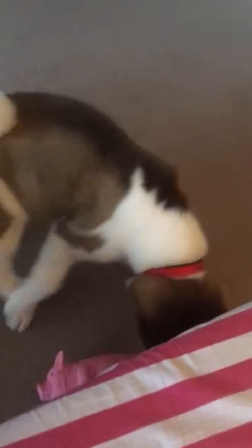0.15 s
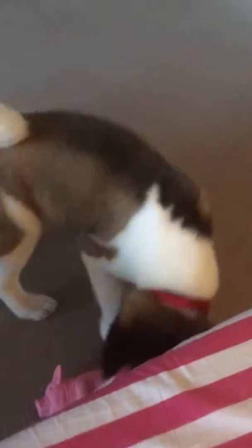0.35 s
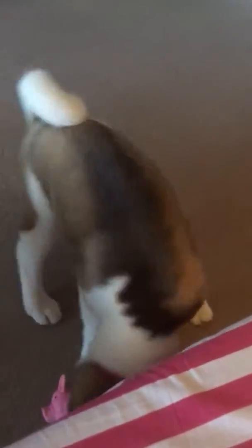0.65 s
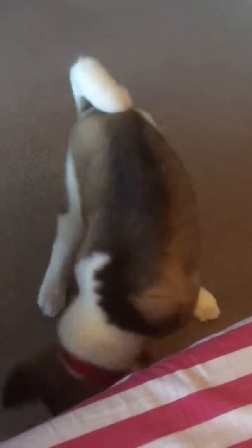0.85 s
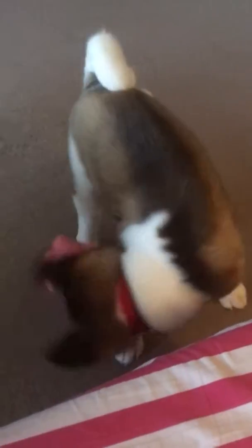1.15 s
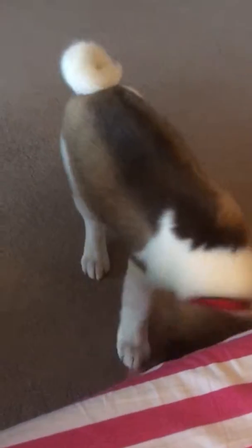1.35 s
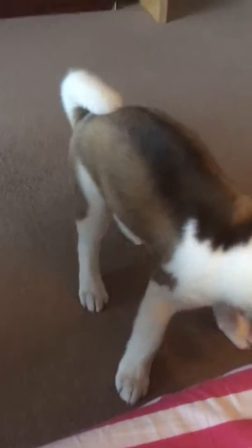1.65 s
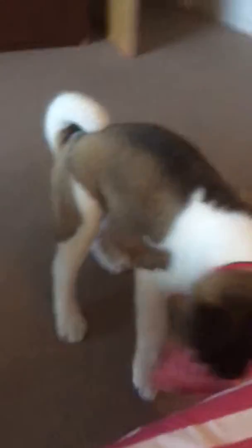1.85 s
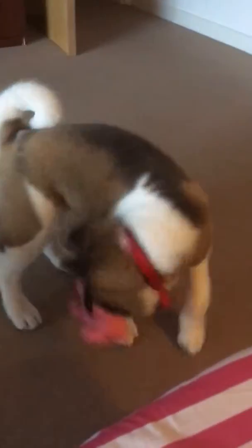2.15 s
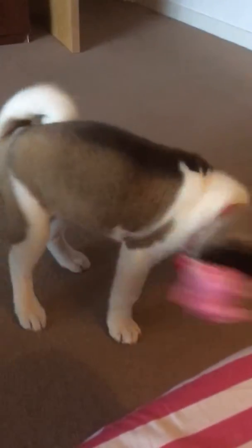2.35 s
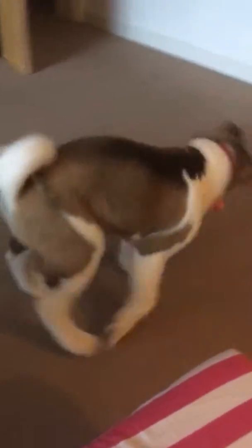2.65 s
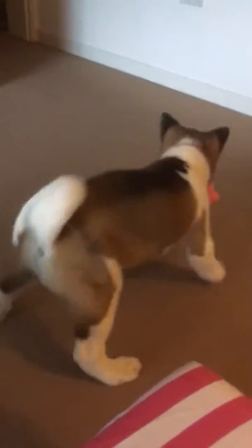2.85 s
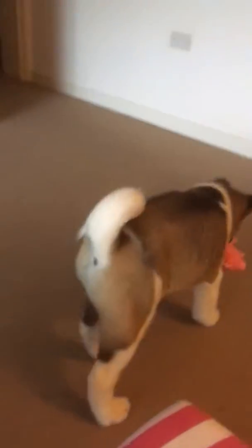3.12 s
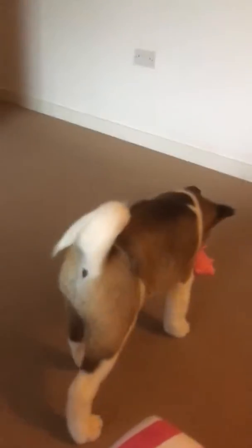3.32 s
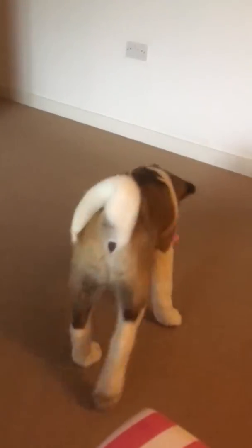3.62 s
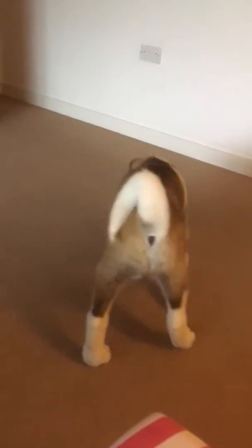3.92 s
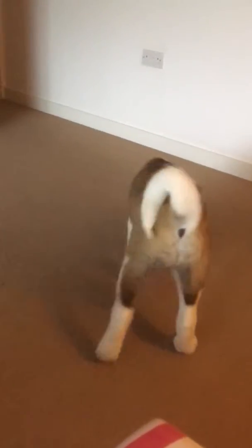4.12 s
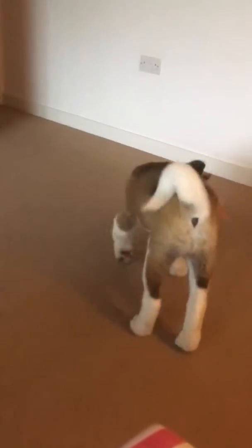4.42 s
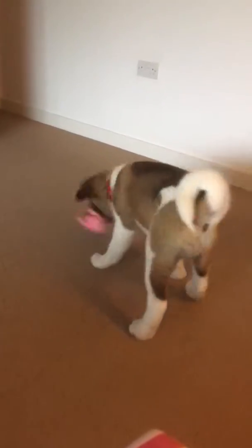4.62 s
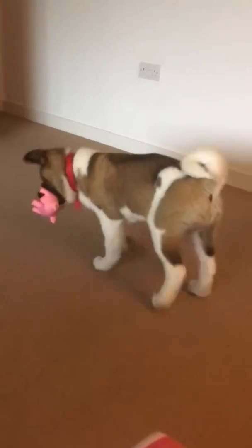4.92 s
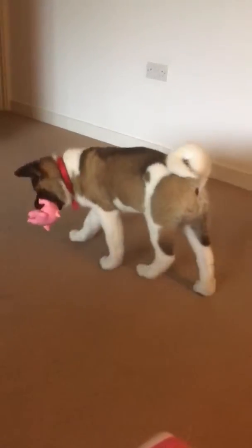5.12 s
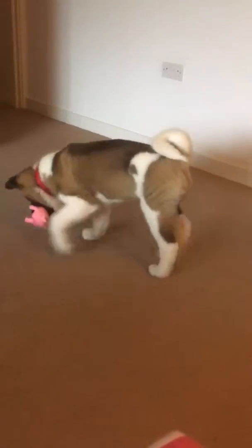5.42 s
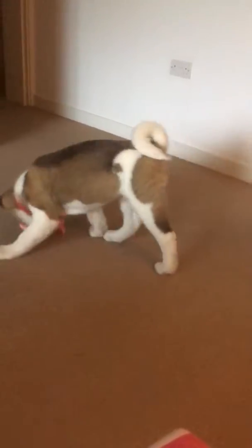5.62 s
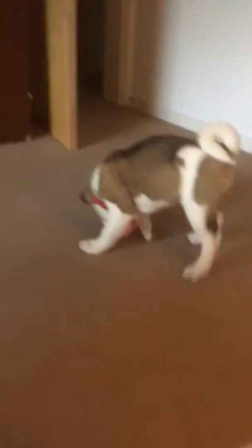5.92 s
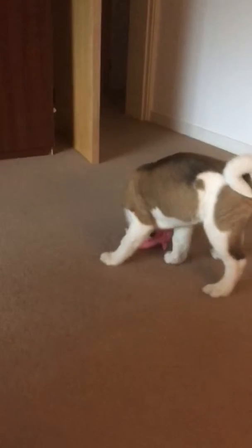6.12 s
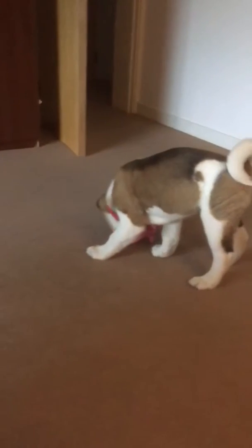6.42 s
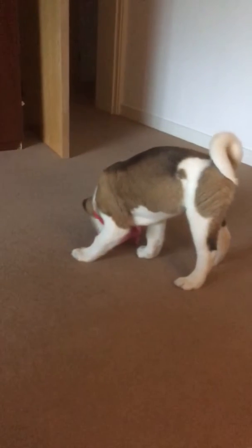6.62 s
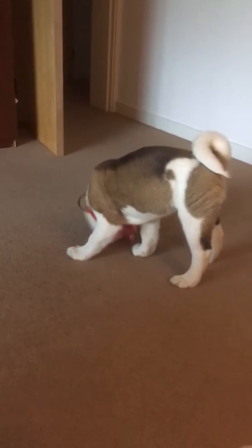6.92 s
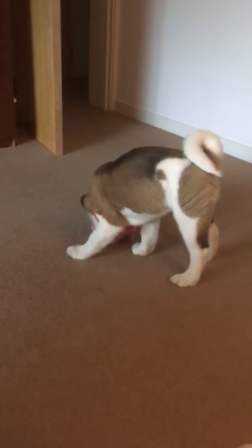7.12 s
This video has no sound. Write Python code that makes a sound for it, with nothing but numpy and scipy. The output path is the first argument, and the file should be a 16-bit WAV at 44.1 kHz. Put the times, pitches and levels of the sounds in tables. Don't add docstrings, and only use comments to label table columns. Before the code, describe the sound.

Short, croaky rubber-toy squeaks come in bursts amid fur brushing carpet, dull paw knocks and claw ticks, over faint house rumble and hiss.

```python
import sys
import numpy as np
from scipy import signal
from scipy.fft import rfft, irfft, next_fast_len
from scipy.io import wavfile
from scipy.ndimage import uniform_filter1d, map_coordinates

SR = 44100
rng = np.random.default_rng(int(sys.argv[2]) if len(sys.argv) > 2 else 0)


def voltage_ratio(decibels):
    exponent = np.asarray(decibels, float) / 20
    return 10 ** exponent


def master(y):
    cut = np.clip(np.atleast_2d(y).T, -1, 1)
    pcm = np.round(cut * 32767)
    wavfile.write(sys.argv[1], SR, pcm.astype(np.int16))


N = 320607


def unit(x):
    return x / np.sqrt(np.mean(x ** 2) + 1e-20)


def along(points, hz):
    f, v = np.transpose(points)
    return np.interp(np.log(hz + 1), np.log(f + 1), v)


def filtered(x, response):
    m = next_fast_len(len(x) + 4096)
    return irfft(rfft(x, m) * response(np.fft.rfftfreq(m, 1 / SR)), m)[:len(x)]


def ringing(modes):
    def shape(f):
        total = 0
        for k, (centre, width, db) in enumerate(modes):
            mode = 1j * f * width / (centre * centre - f * f + 1j * f * width)
            total = total + (-1) ** k * voltage_ratio(db) * mode
        return total
    return lambda f: shape(f) / np.sqrt(np.mean(np.abs(shape(f)) ** 2))


def dulled(hz, edge_hz):
    return 1 / (1 + 1j * hz / edge_hz) ** 2


def noise(spectrum):
    return unit(filtered(rng.standard_normal(N), lambda hz: voltage_ratio(along(spectrum, hz))))


def wobble(rate):
    return map_coordinates(rng.standard_normal(int(N * rate / SR) + 4), [np.arange(N) * rate / SR])


def add(track, s, sound, wet_db):
    # (frequency [Hz], time [s])
    fade_times = [(100, 0.31), (400, 0.33), (650, 0.18), (900, 0.43), (1300, 0.35), (2800, 0.3),
                  (7300, 0.36), (15000, 0.21)]
    # (frequency [Hz], level [dB])
    echo_colour = [(150, 1), (1000, 1.5), (3000, .5), (6000, -2.5), (12000, -3)]
    hz, t, z = signal.stft(rng.standard_normal(SR // 2), SR, nperseg=256)
    tail = signal.istft(z * voltage_ratio(-60 * t / along(fade_times, hz)[:, None]), SR, nperseg=256)[1]
    tail = tail / np.linalg.norm(tail)
    tail = tail * np.clip((np.arange(len(tail)) / SR - .003) / .007, 0, 1)
    tail = filtered(tail, lambda hz: voltage_ratio(along(echo_colour, hz)))
    heard = voltage_ratio(wet_db) * signal.fftconvolve(sound, tail)
    heard[:len(sound)] += sound
    start = round(s * SR)
    track[start:start + len(heard)] += heard


def house():
    # (frequency [Hz], density [dB per Hz])
    deep_colour = [(22, -53), (35, 6), (50, 12), (62, 4.5), (90, -47)]
    # (frequency [Hz], density [dB per Hz])
    drone_colour = [(40, -48), (58, -7.5), (70, -1.5), (100, -6.5), (170, -20.5), (400, -49.5)]
    # (frequency [Hz], density [dB per Hz])
    hiss_colour = [(88, -47), (150, 7.5), (315, -6.5), (888, -5), (1480, -8.5), (2270, -9.5), (4950, -14.5),
                   (10400, -15.5), (14500, -10), (16000, -13.5)]
    # (time [s], level [dB])
    stir = [
        (0, -51),
        (.4, -67),
        (2, -61),
        (3.3, -64.5),
        (3.75, -59.5),
        (4.6, -61.5),
        (5.1, -70.5),
        (5.8, -62.5),
        (7.27, -71.5),
    ]
    s, stir_db = np.transpose(stir)
    t = np.arange(N) / SR
    swell_db = -67.5 + 1.32 * t
    deep = voltage_ratio(swell_db + 0.72 * wobble(1.6)) * noise(deep_colour)
    drone = voltage_ratio(np.interp(t, s, stir_db) + 4.7 * wobble(13.0)) * noise(drone_colour)
    return deep + drone + voltage_ratio(-64.5) * noise(hiss_colour)


def carpet():
    # (start [s], length [s], dull rub level [dB], bright scuff level [dB])
    strokes = [(0, 0.027, -61, -65), (0.072, 0.061, -62, -62), (0.218, 0.078, -64, -60.5),
               (0.337, 0.068, -63.5, -71), (0.565, 0.16, -65, -68.5), (0.97, 0.13, -59.5, -63.5),
               (1.584, 0.087, -70, -71), (1.714, 0.057, -71, -67.5), (1.808, 0.048, -71, -74),
               (2.133, 0.11, -65, -64), (2.415, 0.05, -61, -61.5), (2.507, 0.017, -63.5, -66),
               (2.635, 0.094, -63, -66), (2.809, 0.045, -63.5, -62.5), (2.886, 0.12, -80, -70.5),
               (2.966, 0.078, -75, -64), (3.052, 0.084, -62.5, -91), (3.215, 0.072, -70, -71),
               (3.814, 0.052, -61.5, -65), (3.903, 0.038, -64.5, -57.5), (4.531, 0.013, -61.5, -83),
               (4.634, 0.04, -60.5, -67), (4.7, 0.038, -63.5, -57.5), (4.786, .1, -75, -72.5),
               (4.895, 0.06, -88, -68), (5.083, 0.21, -61, -66.5), (5.636, 0.053, -57, -63),
               (6.493, 0.051, -67.5, -90)]
    # (frequency [Hz], density [dB per Hz])
    rub_colour = [(150, 2.5), (400, 5.5), (1500, 0), (3500, -7), (7000, -15.5)]
    # (frequency [Hz], density [dB per Hz])
    fur_colour = [(590, -33), (1000, -16), (2440, 4), (3750, 1), (10200, -2.5), (14600, -2.5), (16000, -75)]
    # (frequency [Hz], width [Hz], level [dB])
    hollow_modes = [(1400, 250, -3.5), (2360, 200, 1.5), (3460, 290, -3)]
    t, dull, bright = np.arange(N) / SR, np.zeros(N), np.zeros(N)
    for s, length, rub_db, scuff_db in strokes:
        stroke = np.clip((t - s) / 0.0095, 0, 1) * voltage_ratio(-60 * np.clip(t - s - length, 0, 1) / 0.2)
        dull += stroke * voltage_ratio(rub_db)
        bright += stroke * voltage_ratio(scuff_db)
    hollow = np.zeros(N)
    for hz, width, db in hollow_modes:
        tone = unit(filtered(rng.standard_normal(N), ringing([(hz, width, 0)])))
        hollow += voltage_ratio(db + 5.7 * wobble(14)) * tone
    rub = dull * voltage_ratio(1.2 * wobble(76)) * (noise(rub_colour) + voltage_ratio(-14.5) * hollow)
    return rub + bright * voltage_ratio(2.3 * wobble(120)) * noise(fur_colour)


def claws():
    # (time [s], peak level [dB], pitch [Hz])
    ticks = [
        (0.127, -55, 2380),
        (1.8238, -46, 2060),
        (2.4288, -32.5, 1840),
        (2.645, -45, 4520),
        (6.537, -30.5, 660),
        (4.541, -56, 1400),
        (4.583, -40, 636),
    ]
    track, t = np.zeros(N + SR), np.arange(SR // 50) / SR
    for s, db, hz in ticks:
        tick = np.sin(2 * np.pi * hz * t) + 0.42 * np.sin(2 * np.pi * 1.8 * hz * t)
        add(track, s, voltage_ratio(db - 10.0 - 60 * t / 0.016) * tick, wet_db=-9)
    return track[:N]


def paws():
    # (time [s], peak level [dB], board pitch [Hz], slap against thump [dB])
    thumps = [(0.014, -35.5, 108, -15.5), (0.074, -44.5, 118, -9), (1.095, -39.5, 149, -2.5),
              (1.496, -31.5, 242, -7.5), (1.507, -19, 176, -11), (1.529, -28, 140, -36),
              (2.51, -34, 92, -23), (2.689, -51, 134, -5), (2.839, -53, 69, -21),
              (2.968, -31.5, 104, -18.5), (3.299, -51.5, 60, -9), (4.239, -47.5, 111, -9),
              (4.372, -38, 66.5, -9.5), (4.547, -54, 61.9, -3), (4.648, -37.5, 72, -16),
              (4.68, -37, 61.9, -34), (4.72, -41, 71.4, -39), (5.109, -57.5, 61.9, 8.5),
              (5.657, -40, 101, -23), (5.688, -34, 77.5, -38), (6.05, -35, 86, -9),
              (6.534, -43.5, 176, -10.5)]
    track, t = np.zeros(N + SR), np.arange(SR // 5) / SR
    pad = ringing([(279, 190, 8), (514, 290, 9), (810, 660, -0.5)])
    for s, db, hz, slap_db in thumps:
        boards = np.sin(2 * np.pi * hz * t) * voltage_ratio(-60 * t / 0.1) * (1 - np.exp(-t / 0.0012))
        burst = rng.standard_normal(len(t)) * voltage_ratio(-60 * t / .08)
        slap = filtered(burst, lambda f: pad(f) * dulled(f, edge_hz=1000))
        add(track, s, voltage_ratio(db - 0.9) * boards + voltage_ratio(db + slap_db + 1.5) * slap, wet_db=-3.5)
    return track[:N]


def pressure(t, start, end, onset_db, bend, peak_s, peak_db, last_db):
    missing_db = onset_db * np.clip((peak_s - t) / max(peak_s - start, .01), 0, 1) ** bend
    fall = np.clip((t - peak_s) / max(end - peak_s, .003), 0, 1) ** 1.57
    return missing_db, peak_db - missing_db + (last_db - peak_db) * fall


def flap_slaps(t, s, rate, ring_db):
    rate_now = np.interp(t, s, rate)
    turns = np.cumsum(rate_now) / SR
    slaps = (np.diff(np.floor(turns), prepend=-1) > 0) & (t < s[-1] + .5 / rate[-1])
    limp_db = 2.5 * np.interp(rate_now, [150, 195], [0, 1]) * (-1) ** np.floor(turns)
    return slaps * voltage_ratio(21.5 + ring_db - limp_db + rng.standard_normal(len(t)))


def puffs(clicks):
    def rush(shape, mode="full"):
        return signal.fftconvolve(clicks, shape, mode)[:len(clicks)] * rng.standard_normal(len(clicks))
    puff_t = np.arange(400) / SR
    puff = (puff_t / .001) ** 1.5 * voltage_ratio(-60 * puff_t / .0065)
    leak = rush(np.hanning(900), "same")
    air = rush(puff / np.linalg.norm(puff)) + voltage_ratio(-40) * leak
    return air, rush(voltage_ratio(-60 * puff_t / .011) * puff)


def tube_ring(shut, air, flat, tube_hz, flank_db, upper_db):
    # (frequency [Hz], width [Hz], level [dB])
    upper_modes = [(3670, 670, -17.5)]
    upper = [(hz, width, db + upper_db) for hz, width, db in upper_modes]
    sound = 0
    for way in (-.5, .5):
        pitch_hz = tube_hz * (1 - way * 0.029)
        tube = ringing([(0.93 * pitch_hz, 500, flank_db), (pitch_hz, 115, 0)] + upper)
        push = (.5 + 2 * way * flat) * (shut + 0.5 * air)
        sound = sound + filtered(push, lambda hz: voltage_ratio(6.0) * tube(hz) * dulled(hz, edge_hz=2030))
    return sound


def snout_ring(shut, air, snout_hz, db):
    # (share of snout pitch [times], width [Hz], level [dB])
    snout_modes = [(0.766, 139, 4.5), (1.012, 135, 7.5), (1.218, 111, 7), (1.65, 233, -0.5)]
    snout = ringing([(k * snout_hz, width, level) for k, width, level in snout_modes])
    return filtered(voltage_ratio(db + 0.5) * (shut + 0.59 * air), lambda hz: snout(hz) * dulled(hz, edge_hz=1790))


def belly_ring(shut, db, wet_db):
    # (frequency [Hz], width [Hz], level [dB])
    belly_modes = [(193, 52, 8.5), (285, 720, -7)]
    belly = ringing([(100.5, 50, -10 - 2.1 * wet_db)] + belly_modes)
    return filtered(voltage_ratio(db + 1) * shut, lambda hz: belly(hz) * dulled(hz, edge_hz=740))


def jet_whistle(shut, air, jet_hz, db):
    # (frequency [Hz], width [Hz], level [dB])
    jet_modes = [(4586, 310, -7.5), (5170, 190, -8.5), (6140, 1540, -6.5)]
    jet = ringing([jet_modes[0], jet_modes[1], (jet_hz, 500, 0), jet_modes[2]])
    return filtered(voltage_ratio(db) * (air + 0.068 * shut), lambda hz: jet(hz) * (1 - dulled(hz, edge_hz=8600)))


def spit_spray(spit, db, top_db, wet_db):
    # (frequency [Hz], width [Hz], level [dB])
    spit_modes = [(7910, 490, 0.5), (9500, 610, 1), (11280, 780, -2), (12750, 900, -2.5), (15000, 680, -7)]
    thin = ringing([(hz, width, level + rng.normal(0, 2.7)) for hz, width, level in spit_modes])

    def response(hz):
        tilt_db = top_db * (hz / 15000) ** 2 - 0.84 * wet_db * (hz / 15000) ** 4
        return thin(hz) * (1 - dulled(hz, edge_hz=11000)) * voltage_ratio(tilt_db)
    return filtered(voltage_ratio(db - 6.5) * spit, response)


def toy():
    # (time [s], slaps a second [1/s])
    flaps = [
        [(0.6542, 133.8), (0.7012, 212.7), (0.7702, 103.6)],
        [(0.7822, 68.2), (0.9292, 76.7), (0.9622, 67.0)],
        [(1.0592, 83.6), (1.1012, 59.4)],
        [(1.1992, 57.9), (1.3222, 66.9), (1.3412, 74.1)],
        [(1.5062, 63.5), (1.5632, 41.9)],
        [(1.9032, 77.8), (1.9222, 128.1), (1.9762, 59.1)],
        [(2.0605, 80.0), (2.078, 101.0), (2.1352, 58.0)],
        [(2.3292, 86.8), (2.3552, 68.2), (2.3872, 56.3)],
        [(3.3977, 76.0), (3.4372, 74.5), (3.4682, 57.9)],
        [(3.6672, 79.6), (3.6912, 88.2), (3.7572, 63.2)],
        [(4.0892, 113.9), (4.1262, 99.2), (4.1722, 77.8)],
        [(4.349, 82.0), (4.368, 92.0), (4.4142, 58.0)],
        [(5.1722, 87.5), (5.2132, 112.7), (5.2452, 69.0)],
        [(5.4812, 102.4), (5.5162, 122.2), (5.5482, 70.4)],
        [(5.7245, 160.0), (5.744, 208.0), (5.8092, 60.0)],
        [(5.9832, 115.9), (6.0452, 193.4), (6.0702, 81.0)],
        [(6.2752, 134.1), (6.3482, 90.6), (6.3682, 91.0)],
        [(6.7132, 131.3), (6.8182, 93.5), (6.8602, 59.7)],
        [(6.8782, 65.5), (6.9222, 70.2), (6.9682, 61.3)],
        [(7.2152, 128.5), (7.2402, 189.5), (7.2632, 161.6)],
    ]
    # (hardest moment [s], pressure there [dB], pressure at letting go [dB],
    # snout against tube [dB], spit against tube [dB])
    bites = [(0.692, -32, -37, 1, -2.5), (.905, -37.5, -55, -1, -10), (1.086, -45, -47.5, -0.5, -7),
             (1.322, -35, -37, -7, -9.5), (1.513, -48.5, -64, -19, -2), (1.95, -30.5, -36.5, -4.5, -6.5),
             (2.095, -32, -42, -8, -10.5), (2.365, -45.5, -47.5, -5, -4), (3.443, -38.5, -47.5, -7.5, -6.5),
             (3.695, -43, -46.5, -5.5, -6), (4.113, -40.5, -71, -4, -5.5), (4.393, -43.5, -60, -3, -2),
             (5.202, -33.5, -46, -6.5, -8), (5.518, -38.5, -44, -1.5, -2), (5.751, -34.5, -50, -2, 1),
             (6.037, -40.5, -51, 4.5, 2), (6.315, -39.5, -39.5, 3.5, 2), (6.795, -38.5, -51, 3.5, 7),
             (6.922, -46.5, -63, 1.5, 6), (7.26, -50.5, -45, 2, 5.5)]
    # (tube [Hz], jet [Hz], snout [Hz], jet against tube [dB],
    # room against direct sound [dB])
    grips = [(2356, 5840, 745, -0.5, -1), (2380, 5300, 767, -6.5, -2), (2440, 5100, 660, -3, -1.5),
             (2420, 5100, 826, -4, -4.5), (2340, 5600, 460, -4.5, 2), (2380, 6150, 780, -0.5, -5.5),
             (2435, 5060, 790, -5.5, -7), (2380, 5000, 670, -1.5, -7), (2450, 5000, 610, -2.5, 0.5),
             (2380, 5180, 606, -4, 8), (2380, 5750, 630, -2.5, 5.5), (2410, 5100, 780, 1, 0),
             (2434, 5650, 756, -1, -2.5), (2465, 5900, 730, -2, 1.5), (2420, 5670, 750, 0, 0),
             (2550, 5900, 790, 1.5, -0.1), (2396, 5700, 770, -2.5, 3.5), (2380, 5720, 760, 0.5, 2.5),
             (2380, 3860, 803, 3.5, 4.5), (2400, 5150, 800, -4.5, 7.5)]
    track = np.zeros(N + SR)
    let_go = 0
    for flap, (*push, snout_db, spit_db), grip in zip(flaps, bites, grips):
        s, rate = np.transpose(flap)
        start, end = s[0], s[-1]
        tube_hz, jet_hz, snout_hz, jet_db, wet_db = grip
        t = start + np.arange(round((end - start) * SR) + SR // 10) / SR
        onset_db = 10 if start - let_go < .03 else 21.5
        let_go = end
        bend = 2.6 * rate[0] / 100
        missing_db, ring_db = pressure(t, start, end, onset_db, bend, *push)
        below_db = ring_db - ring_db.max()
        flat = np.interp(t, [start, end], [-.5, .5])

        belly_db = -4 + 0.56 * missing_db + 0.74 * snout_db
        snout_db = snout_db - 8.5 * flat
        spit_db = spit_db + 0.5 * flat
        top_db, upper_db = 0.24 * spit_db.mean(), 0.21 * spit_db.mean()
        late_db = 4 * np.interp(t, [start, push[0]], [1, 0])
        jet_db = jet_db + 0.5 * flat + 0.13 * below_db - late_db
        spit_db = spit_db + 0.2 * below_db - late_db
        flank_db = -10 + 1.5 * np.log2(rate.max() / 100)

        clicks = flap_slaps(t, s, rate, ring_db)
        air, spit = puffs(clicks)
        shut = np.roll(clicks, round(.0009 * SR))
        sound = tube_ring(shut, air, flat, tube_hz, flank_db, upper_db)
        sound += snout_ring(shut, air, snout_hz, snout_db)
        sound += belly_ring(shut, belly_db, wet_db)
        sound += jet_whistle(shut, air, jet_hz, jet_db)
        sound += spit_spray(spit, spit_db, top_db, wet_db)
        add(track, start - .0008, sound, wet_db)
    return track[:N]


def scene():
    return (house() + carpet() + claws() + paws() + toy())[None]


def top_cut(x):
    return signal.sosfilt(signal.butter(12, 16660, fs=SR, output="sos"), x)


def record(dry):
    def port(hz):
        dip = 1 - 0.42 * np.exp(-((hz - 10300) / 350) ** 2)
        return dip * (hz < 15870) / (1 + (30 / (hz + 1)) ** 4)
    heard = filtered(dry[0], port)
    treble = filtered(heard, lambda hz: 1 / (1 + (1500 / (hz + 1)) ** 2))
    power = uniform_filter1d(treble ** 2, size=round(0.036 * SR))
    level_db = 10 * np.log10(np.abs(power) + 1e-12)
    closed = np.clip((-61 - level_db) / 20, 0, 1)
    mix = heard - (1 - voltage_ratio(-11 * closed)) * treble
    return top_cut(mix[None])


dry = scene()
out = record(dry)
master(out)
```